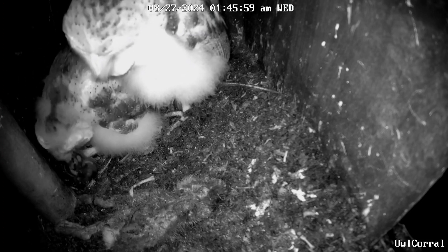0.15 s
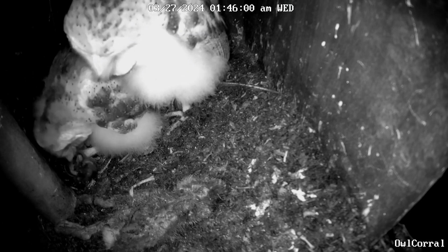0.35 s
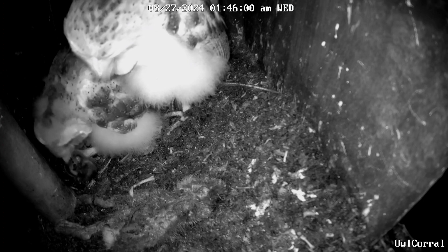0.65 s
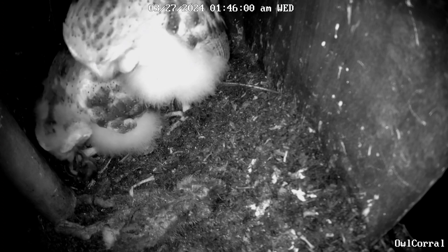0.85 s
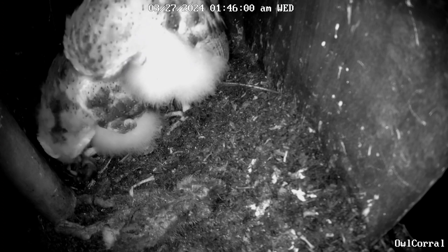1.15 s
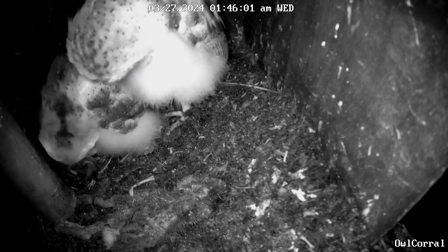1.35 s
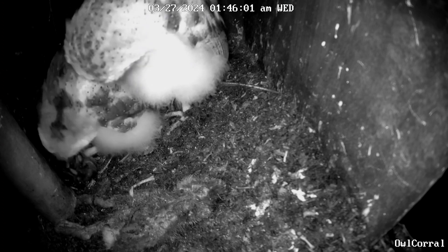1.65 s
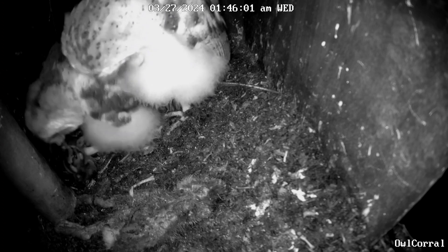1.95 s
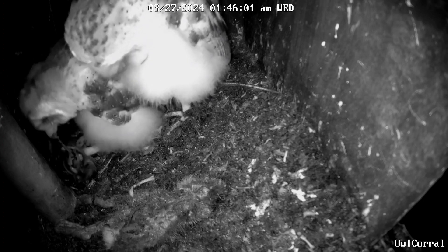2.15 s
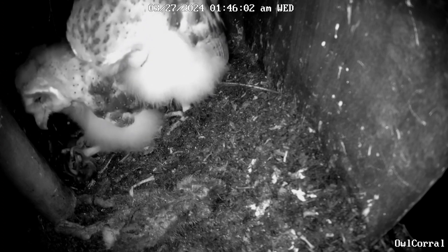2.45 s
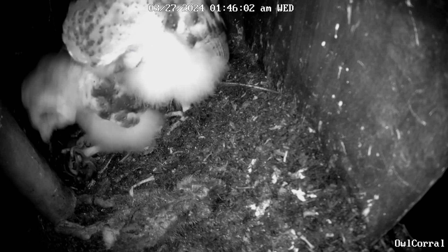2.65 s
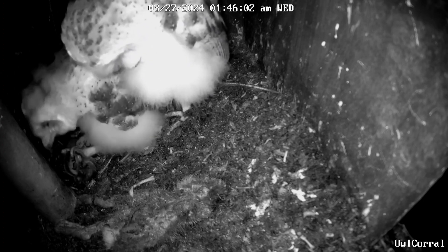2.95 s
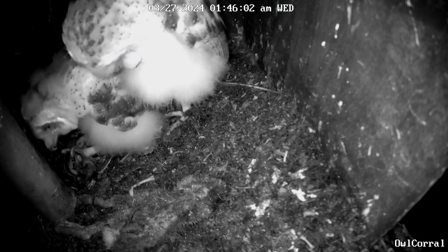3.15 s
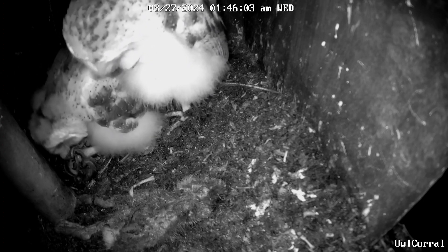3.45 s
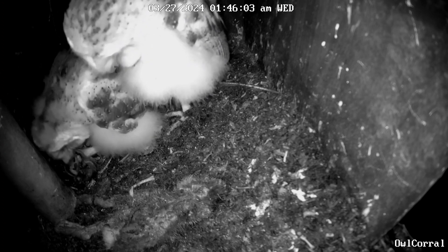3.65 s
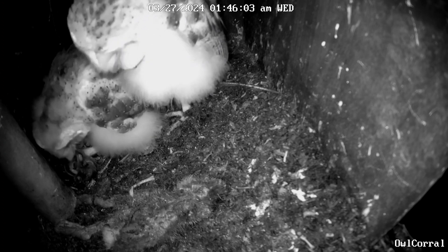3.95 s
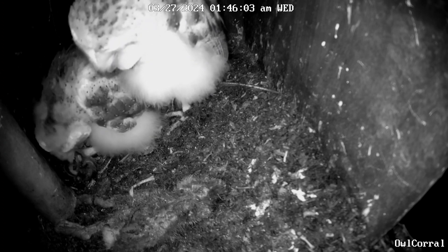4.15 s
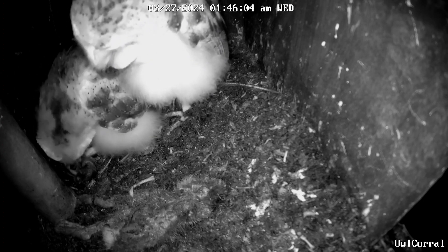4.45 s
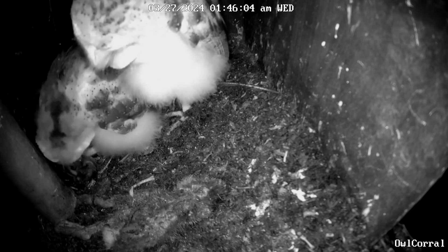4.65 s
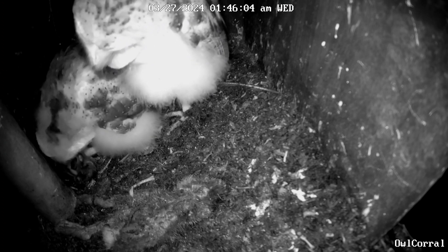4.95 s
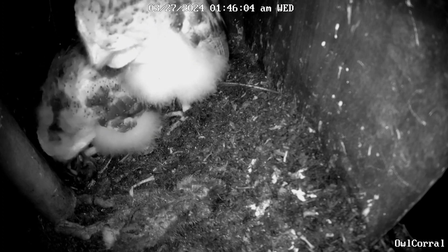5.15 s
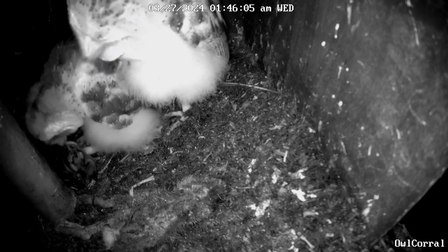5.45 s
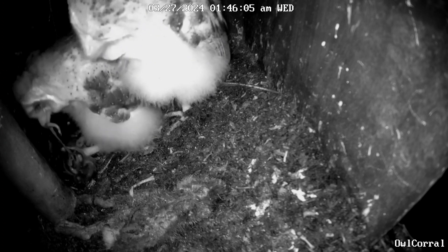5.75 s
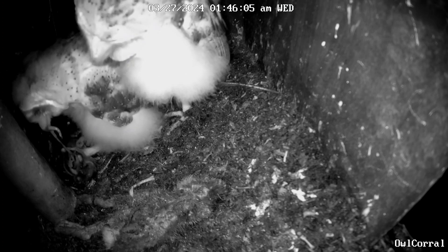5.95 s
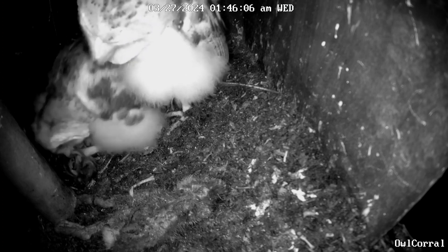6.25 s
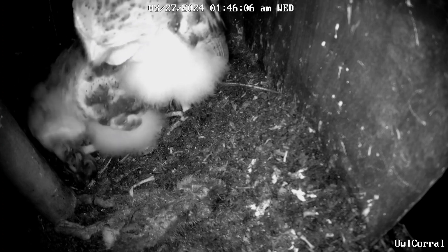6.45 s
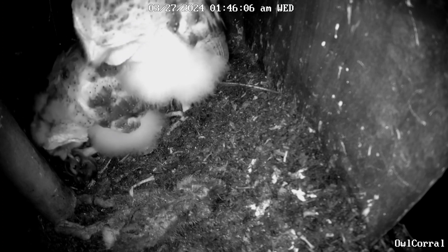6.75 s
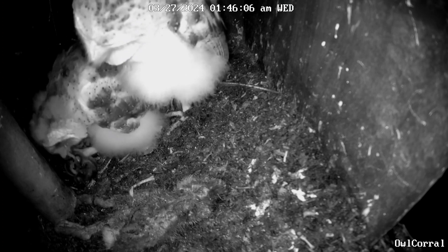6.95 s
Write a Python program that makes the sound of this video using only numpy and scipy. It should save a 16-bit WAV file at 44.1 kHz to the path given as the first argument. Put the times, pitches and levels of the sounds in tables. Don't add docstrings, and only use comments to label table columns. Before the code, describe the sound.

A wooden nest box at night, heard by a small microphone on the wall, mono with limited treble that briefly drops out now and then. From the start there is low rumble, faint steady hum, thin background hiss and rapid faint ticking. Outside, tree frogs give short throbbing chirps and creaky climbing notes, some near, others blurred into a distant chorus. A very faint soft hoot comes around 2.0 s. From 2.3 to 2.8 s an owlet forces out a harsh, torn, widening hiss, ending with a beak snap. A second, slightly narrower rasp runs from 3.9 to 4.3 s, again snapped shut. Frogs continue between. A weak bump comes at 5.9 s, then the loudest hiss from 6.1 to 6.55 s with a click. Hollow wooden thumps follow at 6.6 s and in a cluster around 6.9 s, as frogs croak on to the end at about 7 s.

```python
import sys
import numpy as np
from scipy import signal
from scipy.fft import rfft, irfft, next_fast_len
from scipy.io import wavfile
from scipy.ndimage import uniform_filter1d, map_coordinates

SR = 44100
rng = np.random.default_rng(int(sys.argv[2]) if len(sys.argv) > 2 else 0)


def store_wav(level_fs):
    pcm = np.round(np.clip(np.atleast_2d(level_fs), -1, 1) * 32767)
    wavfile.write(sys.argv[1], SR, pcm.T.astype(np.int16))


def elevation(decibels):
    levels = np.asarray(decibels, float)
    return 10 ** (levels / 20)


N = 312669
T = np.arange(N) / SR


def unit(x):
    return x / np.sqrt(np.mean(x ** 2))


def band(x, lo_hz, hi_hz, order=2):
    return signal.sosfilt(signal.butter(order, [lo_hz, hi_hz], "band", fs=SR, output="sos"), x)


def colour(x, points):
    hz, db = np.transpose(points)
    size = next_fast_len(N)
    f = np.fft.rfftfreq(size, 1 / SR) + 1
    gain = elevation(np.interp(np.log(f), np.log(hz), db))
    return unit(irfft(rfft(x, size) * gain, size)[:N])


def resonate(x, modes):
    out = 0
    for k, (hz, width_hz, db) in enumerate(modes):
        ring = signal.lfilter(*signal.iirpeak(hz, hz / abs(width_hz), SR), x)
        out = out + (-1) ** k * elevation(db) * ring
    return out


def walk(rate):
    k = int(SR / rate)
    return unit(uniform_filter1d(uniform_filter1d(rng.standard_normal(N), k), k))


def track(tables, column, silent):
    out = np.full(N, float(silent))
    for rows in tables:
        rows = np.array(rows)
        on = (T >= rows[0, 0]) & (T <= rows[-1, 0])
        out[on] = np.interp(T[on], rows[:, 0], rows[:, column])
    return out


def pips(rows):
    out = np.zeros(N + 2400)
    t = np.arange(-1200, 1200) / SR
    for (s, hz, db, half_s, glide), turn in zip(rows, rng.random(len(rows))):
        shape = np.cos(np.pi / 2 * np.clip(t / half_s, -1, 1)) ** 2
        tone = np.sin(2 * np.pi * (hz * t * (1 + glide * t) + turn))
        i = int(s * SR)
        out[i:i + len(t)] += elevation(db) * shape * tone
    return out[1200:N + 1200]


def gate():
    closes_s, at_start = 0.65, 0.17
    opening = [at_start * np.exp(-T / closes_s)]
    for hiss in HISSES:
        start, end = hiss[0][0], hiss[-1][0]
        opening.append(np.where(T < start, 0, np.exp(-np.maximum(T - end, 0) / closes_s)))
    return np.max(opening, axis=0)


# pitch_hz, level_db (per Hz)
RUMBLE_TONE = [(8.8, -30), (15, 1.5), (28, -4), (43, -7), (91, -5), (124, -0.5), (136, -4.5), (147, -15),
               (260, -35), (340, -62), (570, -120)]
# time_s, swell_db, half_length_s
SHAKES = [(0.522, 3.5, 0.074), (1.03, 7.5, .15), (2.334, 15, 0.078), (2.615, 15.5, .22), (4.098, 12, 0.51),
          (5.92, 7, 0.0786), (6.145, 13, 0.35), (6.956, 14, 0.89)]


def rumble():
    shake_db = sum(db * np.maximum(1 - np.abs(T - s) / half_s, 0) for s, db, half_s in SHAKES)
    return colour(rng.standard_normal(N), RUMBLE_TONE) * elevation(-63 + shake_db + 1.7 * walk(2.7))


def mains_hum():
    return elevation(-64.5 + 1.5 * walk(2.2)) * np.sin(2 * np.pi * 121 * T)


# time_s, pitch_hz, level_db
HOOT = [(1.96, 567.7, -75), (1.99, 546.5, -74), (2.01, 505, -62.5), (2.05, 495, -78), (2.08, 488, -92)]


def far_hoot():
    level_db, hz = track([HOOT], column=2, silent=-150), track([HOOT], column=1, silent=500)
    return elevation(level_db) * np.sin(2 * np.pi * np.cumsum(hz) / SR)


TICK_FRAMES = [0, 2, 3, 5, 7, 9, 11, 13]


def camera_ticks():
    first_s, frame_s = .0545, 1 / 15
    hits = np.zeros(N + 2 * SR)
    starts = first_s + np.add.outer(np.arange(8), frame_s * np.array(TICK_FRAMES)).ravel()
    hits[(starts * SR).astype(int)] = elevation(1.5 * rng.standard_normal(len(starts)))
    t = np.arange(-600, 900) / SR
    shape = elevation(-4.0) * (t > -.006) * (t < .011) + 1.6 * np.exp(-((t - .0017) / 0.0014) ** 2)
    noise = unit(band(rng.standard_normal(N), 4270, 11000, order=1))
    return elevation(-72) * np.convolve(hits, shape)[600:N + 600] * noise


# pitch_hz, level_db (per Hz)
NIGHT_TONE = [(110, -27.5), (180, -4), (229, -1), (468, -3), (623, -6), (1280, -5), (1780, -8),
              (2190, -8.5), (2490, -5.5), (3370, -12), (5800, -14), (7600, -15.5), (8100, -23.5),
              (10500, -57.5), (17800, -120)]


def night():
    hiss = colour(rng.standard_normal(N), NIGHT_TONE) * elevation(-75 + 1.2 * walk(6.8)) + camera_ticks()
    return rumble() + mains_hum() + far_hoot() + hiss * elevation(3 * gate())


def chorus():
    out = 0
    for detune, rate, note in rng.random((9, 3)):
        rise = (T * (0.94 + 5.4 * note) + rate) % 1
        hz = 2550 * (.8 + 0.25 * detune + 0.1 * rise)
        throb = np.sin(np.pi * (48 + 11 * rate) * T) ** 4
        turn = 2 * np.pi * np.cumsum(hz) / SR
        tone = np.sin(turn) + elevation(-15.5) * np.sin(0.43 * turn)
        out = out + np.sin(np.pi * rise) ** 2 * throb * elevation(6.5 * walk(2.5)) * tone
    t = np.arange(8000) / SR
    blur = rng.standard_normal(len(t)) * elevation(-60 * t / 0.13)
    return unit(signal.fftconvolve(out, blur)[:N]) * elevation(-78 + 6.5 * gate())


def croak(notes, half_s, first_db, last_db, climb_hz_s, loudest, under):
    throb_s = .0185
    rows = []
    for first, last, from_hz, db, *under_db in notes:
        undertone_db = under_db[0] if under_db else -23
        s = np.linspace(first, last, int(round((last - first) / throb_s)) + 1)
        hz = (from_hz + climb_hz_s * (s - first)) * (1 + 0.015 * rng.standard_normal(len(s)))
        top = int(loudest * len(s))
        away = np.interp(s, [first - throb_s / 4, s[top], last + throb_s / 2], [-1, 0, 1])
        fall_db = np.where(away < 0, first_db * min(1, 0.35 + 0.3 * top), last_db)
        level_db = db + fall_db * np.abs(away) ** 1.45
        for a, f, g in zip(s, hz, level_db):
            rows.append((a, f, g, half_s, 1.5))
            rows.append((a - .002, 1.2 * f, g - 21, .0011, 1.5))
            rows.append((a - .0015, 0.92 * f, g - 8, .0035, 3.5))
            rows.append((a + 0.0014, under * f, db + 0.28 * (g - db) + undertone_db, .0035, 1.5))
    return pips(rows)


# first_throb_s, last_throb_s, from_hz, peak_db, undertone_db
LONG_NOTES = [(.679, .826, 2260, -45, -18.5), (1.55, 1.638, 2356, -49, -27),
              (2.266, 2.284, 2340, -43.5, -15), (3.115, 3.238, 2310, -50, -27),
              (3.47, 3.612, 2290, -42, -24), (3.769, 3.823, 2640, -48.5, -27.5),
              (4.788, 4.903, 2310, -43.5, -18.5), (5.11, 5.213, 2356, -44, -35),
              (5.465, 5.595, 2280, -46, -15.5), (6.049, 6.108, 2320, -43.5, -15),
              (6.63, 6.766, 2300, -39, -19.5), (6.792, 6.871, 2360, -38, -14)]
# first_throb_s, last_throb_s, from_hz, peak_db, undertone_db
SHORT_NOTES = [(.845, .923, 2513, -45, -20), (.963, .999, 2490, -40.5, -26), (1.725, 1.779, 2540, -46, -21),
               (2.77, 2.821, 2390, -45, -10), (2.846, 2.882, 2480, -41.5, -14),
               (3.326, 3.344, 2470, -44.5, -21), (3.718, 3.751, 2513, -35.5, -25),
               (4.341, 4.36, 2580, -43.5, -13), (5.023, 5.057, 2510, -40, -27.5),
               (5.301, 5.339, 2520, -42, -24.5), (5.691, 5.726, 2490, -44, -7),
               (6.896, 6.936, 2574, -48, -11), (6.964, 7.003, 2594, -37, -13.5)]
# first_throb_s, last_throb_s, from_hz, peak_db
SMALL_FROG = [(.54, .65, 2953, -65.5), (1.598, 1.671, 3042, -57.5), (1.766, 1.8, 3280, -49),
              (3.115, 3.17, 3100, -58), (3.284, 3.32, 3270, -55), (4.56, 4.6, 3170, -66),
              (4.709, 4.744, 3282, -60.5), (5.735, 5.79, 2766, -65)]
# first_throb_s, last_throb_s, from_hz, peak_db
FAR_FROGS = [(.008, .044, 2510, -58.5), (.085, .122, 2550, -58.5), (.155, .172, 2724, -52.5),
             (.322, .382, 2540, -56.5), (.44, .49, 2540, -58), (.66, .697, 2230, -67),
             (1.08, 1.17, 2310, -69), (1.27, 1.36, 2260, -66), (1.92, 2.13, 2400, -66.5),
             (2.913, 2.933, 2550, -57.5), (2.974, 2.991, 2678, -56), (3.637, 3.674, 2510, -53.5),
             (3.742, 3.76, 2032, -59.5), (5.04, 5.058, 2730, -56), (4.605, 4.625, 2690, -57),
             (5.608, 5.645, 2505, -53.5), (5.9, 6.03, 2290, -63), (7.016, 7.075, 2364, -55.5)]
# first_throb_s,
# last_throb_s, from_hz, peak_db
LEVEL_FROG = [(2.2, 2.29, 2930, -61), (3.721, 3.78, 970, -58), (4.323, 4.45, 2990, -57.5),
              (4.378, 4.527, 2570, -55.5), (4.523, 4.642, 3000, -55.5)]


def frogs():
    calls = (croak(LONG_NOTES, 0.0055, -25.0, -4.0, climb_hz_s=1280, loudest=0.81, under=0.418)
             + croak(SHORT_NOTES, 0.0045, -3, -11.5, climb_hz_s=100, loudest=.05, under=0.474)
             + croak(SMALL_FROG, 0.0054, -6, -12, climb_hz_s=1840, loudest=.55, under=0.49)
             + croak(FAR_FROGS, 0.0046, -12, -3, climb_hz_s=900, loudest=.45, under=0.52)
             + croak(LEVEL_FROG, 0.0088, -7.5, -9, climb_hz_s=400, loudest=.6, under=.44))
    calls = calls + elevation(-15.5) * np.roll(calls, int(0.0063 * SR))
    t = np.arange(4000) / SR
    scatter = rng.standard_normal(len(t)) * elevation(-60 * t / .09) * (t > .004)
    scatter = scatter / np.sqrt(np.sum(scatter ** 2))
    return calls + elevation(-9) * signal.fftconvolve(calls, scatter)[:N]


# pitch_hz, level_db, t60_s
PANELS = [(75.1, -2, 0.42), (95, 5.5, 0.21), (131.2, 4, 0.15), (216.5, -9.5, 0.17), (291.6, -18, 0.3),
          (385.68, -8.5, 0.05756), (452.45, -39, .08)]
# time_s, peak_db, deepest_panels_db
BUMPS = [(5.913, -44, 11), (5.924, -40.5, 4), (6.625, -14, -10), (6.647, -21.5, -26), (6.82, -38, -2.5),
         (6.885, -19.5, -13.5), (6.901, -17, -4), (6.921, -25.5, 4), (6.939, -29.5, 7.5)]


def bumps():
    out, t = np.zeros(2 * N), T[:SR // 2]
    push = np.hanning(int(.0036 * SR))
    for (s, db, deep_db), turns in zip(BUMPS, rng.standard_normal((len(BUMPS), len(PANELS)))):
        ring = 0
        for (hz, panel_db, t60), z in zip(PANELS, turns):
            level_db = panel_db + 2.2 * np.tanh(z) + deep_db * (hz < 100) - 60 * t / t60
            ring = ring + elevation(level_db) * np.sin(2 * np.pi * hz * t)
        i = int(s * SR)
        out[i:i + len(t)] += elevation(db - 10.5) * np.convolve(ring, push / push.sum())[:len(t)]
    return band(out[:N], 66, 900, order=4)


# time_s, pitch_hz, peak_db, half_length_s, glide_per_s
SNAPS = [(1.11, 680, -68, 0.005984, -5), (2.729, 2044, -27.5, .01, -4), (2.752, 1220, -36, 0.008, -7),
         (3.024, 297, -55.5, 0.0073, -14.5), (4.261, 2116, -25, 0.0079, -7),
         (4.269, 315, -29.5, 0.013, -14), (4.28, 1206, -37.5, 0.019, 2), (4.789, 282, -65.5, 0.009642, 2),
         (4.79, 777, -58, 0.0036, 0), (6.531, 2018, -25, 0.009, 0)]


def snaps():
    return pips(SNAPS)


# pitch_hz, width_hz, level_db
BEAK = [(2912, 61, -1), (3040, 44, -7), (3204, 65, 2), (3442, 239.4, -1.5), (3564.7, 66, 1.5),
        (3554, 31, -6.5), (3755, 76, 0.5)]
GAPE = [(4313, 9.9, 2), (4385, 54, -8), (4506, 210, -1), (4540, 90, 7.5), (4666, 52, -3), (4820, 44, -10.5),
        (5185, 340, -8), (5570, 69, -6)]
THROAT = [(2106, 89, -1), (2400, 49, 0.55), (2550, 34, -3.3)]
EDGE = [(6210, 120, -4.5), (6560, 100, -3.5), (7500, 1000, -7.5)]
# pitch_hz, level_db (per Hz)
CHEST = [(41, -40.5), (70, -15.5), (119, -1), (201, -10.5), (307, 4), (372, -4.5), (483, 2.5), (569, -2),
         (662, -16.5), (813, -24.5), (907, -11), (1010, -7), (1190, -4), (1470, -9), (1850, -1),
         (2400, -37.5), (4070, -120)]
# time_s, effort_db, beak_opening (0-1)
HISSES = [
    [(2.275, -73, 0.5), (2.29, -59.5, 0.42), (2.36, -31, 0.15), (2.45, -27, 0.61), (2.63, -19, 0.76),
     (2.7, -22.5, 0.95), (2.745, -40.5, 0), (2.765, -57, .2), (2.83, -77.5, 0.1)],
    [(3.862, -65.5, 0), (3.872, -50, 0), (3.9, -30, 0.04), (4.0, -28.5, 0.45), (4.16, -20, 0.62),
     (4.23, -23.5, 0.69), (4.275, -36.5, 0.5), (4.295, -55, 0.03), (4.36, -67, 0.25)],
    [(6.103, -64, 0.02), (6.113, -50.5, 0), (6.15, -25, 0.28), (6.2, -27.5, 0.69), (6.37, -17.5, .75),
     (6.5, -18, 1.03), (6.537, -37.5, 0.53), (6.548, -50.5, 0.25), (6.608, -66.5, 0.13)],
]


def owlet():
    air = rng.standard_normal(N) * elevation(1.7 * walk(900) + 0.37 * walk(120) + 0.93 * walk(30))
    slap_size = elevation(3.5 * np.minimum(rng.exponential(size=N), 2.6))
    slaps = (rng.random(N) < 450 / SR) * rng.choice([-1, 1], N) * slap_size
    air = unit(air) + elevation(-4) * unit(slaps)

    beak_db, opening = track(HISSES, column=1, silent=-150), track(HISSES, column=2, silent=0)
    shut_db, open_db = 5.5, -13
    throat_db = beak_db + shut_db + (open_db - shut_db) * opening
    chest_db = np.minimum(-37 + 0.18 * (throat_db + 30.5), throat_db - 1)
    edge_db = -35 + 0.94 * (beak_db + 27.5)
    gape_db = beak_db - 1.5 + 0.5 * np.clip(beak_db + 21, -14, 6)

    beak = band(resonate(air, BEAK) + elevation(-16.5) * band(air, 3100, 4100), 2550, 3800)
    gape = band(resonate(air, GAPE) + elevation(-14.0) * band(air, 2800, 7800), 3600, 8900)
    throat = band(resonate(air, THROAT) + elevation(-21.0) * band(air, 1800, 3200), 1750, 2700)
    edge = band(resonate(air, EDGE) + elevation(-19.5) * band(air, 5700, 7200), 6100, 11000)
    chest = colour(air, CHEST)
    layers = [(beak, beak_db - .6), (gape, gape_db), (throat, throat_db), (chest, chest_db), (edge, edge_db)]
    hiss = sum(unit(x) * elevation(db) for x, db in layers)

    wall_s, sway_s, wall_db = 0.0011014, .00012, -8
    echo = map_coordinates(hiss, [(T - wall_s - sway_s * walk(5)) * SR], mode="nearest")
    return (hiss + elevation(wall_db) * echo) / np.hypot(1, elevation(wall_db))


def scene():
    mono = night() + chorus() + frogs() + bumps() + snaps() + owlet()
    return np.array([mono, mono])


# start_s, end_s
DROPOUTS = [(.95, 1.012), (3.7, 3.888), (4.985, 5.045), (6.07, 6.194)]


def treble_dropouts(x):
    keep = np.ones(N)
    for start, end in DROPOUTS:
        keep[int(start * SR):int(end * SR)] = 0
    low = signal.sosfiltfilt(signal.ellip(6, .1, 45, 4400, fs=SR, output="sos"), x)
    return low + (x - low) * uniform_filter1d(keep, size=300)


def roll_off(x):
    return signal.sosfilt(signal.butter(12, 8250, fs=SR, output="sos"), x)


def record(dry):
    x = treble_dropouts(dry)
    x = signal.sosfilt(signal.ellip(10, .3, 90, 7820, fs=SR, output="sos"), x)
    x = x * (1 + elevation(-45.5) * walk(150) * np.array([[1], [-1]]))
    x = x + elevation(-99.0) * rng.standard_normal(N) + elevation(-111) * rng.standard_normal((2, N))
    return roll_off(x)


dry = scene()
out = record(dry)
store_wav(out)
```